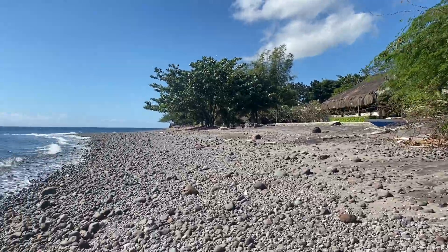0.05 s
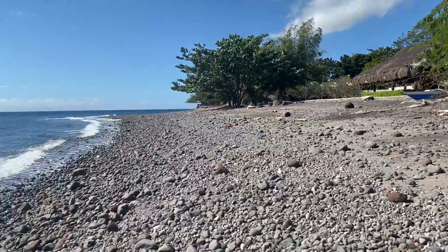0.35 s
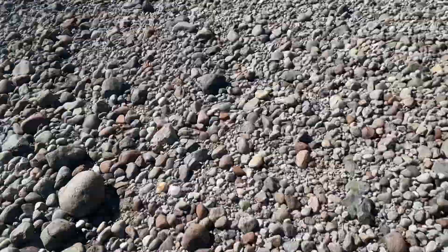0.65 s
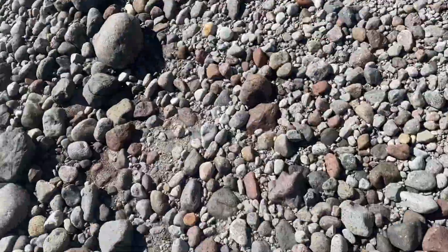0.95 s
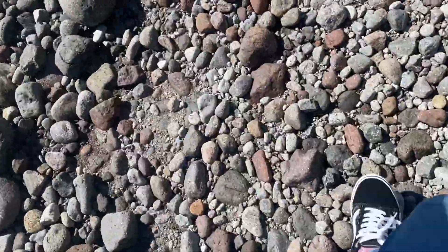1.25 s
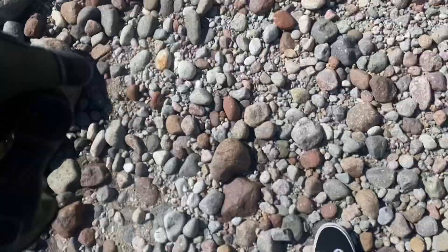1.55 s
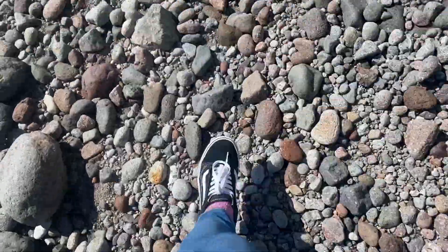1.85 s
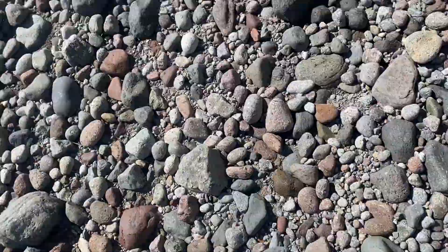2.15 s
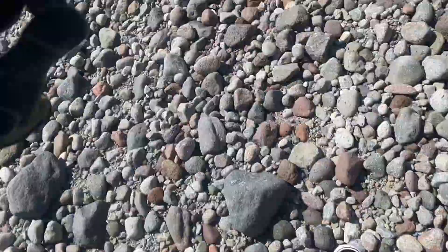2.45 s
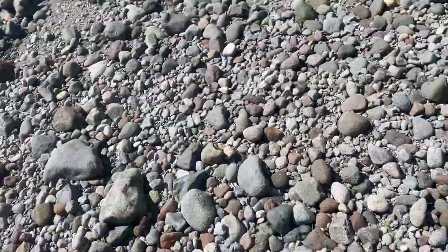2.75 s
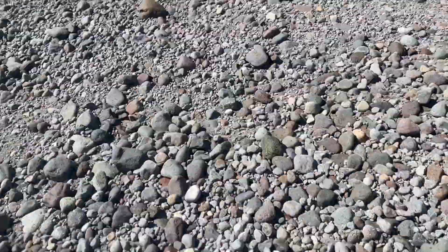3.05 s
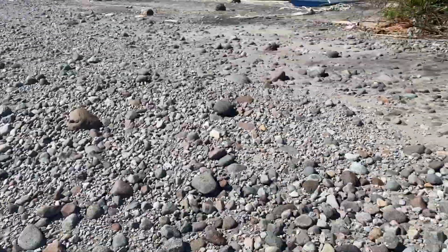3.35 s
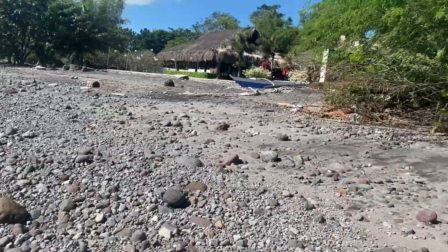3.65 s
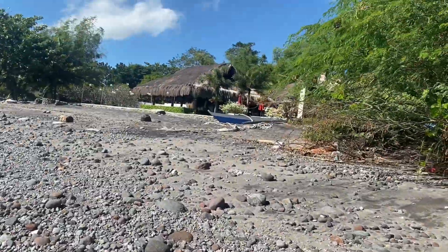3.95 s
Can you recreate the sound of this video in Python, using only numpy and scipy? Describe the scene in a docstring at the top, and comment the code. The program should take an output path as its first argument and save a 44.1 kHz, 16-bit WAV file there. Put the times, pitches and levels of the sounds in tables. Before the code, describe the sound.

Footsteps crunch over loose pebbles close to the microphone, stones clicking and knocking with each step. Surf washes softly along the beach behind them, and wind gusts thump on the microphone, stronger in the second half.

```python
"""Footsteps on a pebble beach

Close to a stereo microphone, someone walks over loose pebbles, a step about every 0.55 s.
Each step sets off a shower of tiny stone collisions and a few louder knocks.
Surf washes in the background, a far hum comes and goes, and gusts buffet the microphone."""
import sys
import numpy as np
from scipy import signal
from scipy.fft import rfft, irfft
from scipy.io import wavfile
from scipy.ndimage import uniform_filter1d

SR = 44100
rng = np.random.default_rng(int(sys.argv[2]) if len(sys.argv) > 2 else 0)


def wav_out(sig):
    """Save sig, one row per channel (or a flat mono array), as 16-bit PCM at SR to the path in sys.argv[1]."""
    wavfile.write(sys.argv[1], SR, np.round(np.clip(np.atleast_2d(sig).T, -1, 1) * 32767).astype(np.int16))


N = 176400

# Surf at the microphone (time [s], level [dB], share heard from behind [0-1])
SURF_LEVEL = [(0, -34.5, 0.15), (.3, -37, 0.048), (.55, -36.5, 0.01), (1.15, -37.5, 0.11),
              (1.7, -38.5, 0.11), (2.1, -36.5, 0.33), (2.5, -33.5, 0.39), (3, -33, 0.82),
              (3.5, -32.5, 0.92), (4, -32, 0.86)]
# The sea heard from the front (frequency [Hz], relative level [dB])
SURF_FRONT_COLOUR = [(30, -21), (60, -9.5), (130, -9.5), (280, -9), (660, -13.5), (1200, -18.5),
                     (1700, -22.5), (2900, -28), (4500, -31.5), (7000, -36.5), (10000, -39), (15000, -40.5)]
# The sea heard from behind (frequency [Hz], relative level [dB])
SURF_BACK_COLOUR = [(60, 4), (200, 4), (500, -4), (1100, -8.5), (1800, -8), (2600, -15.5), (3200, -21.5),
                    (6200, -22.5), (8000, -29), (10000, -32), (15000, -37.5)]
# Stereo image of the surf (frequency [Hz], left-right correlation [-1 to 1])
SURF_LIKENESS = [(60, 1), (280, 0.69), (600, -0.34), (1100, -0.51), (1700, -0.25), (2700, 0.47),
                 (3600, 0.0044), (6500, 0.097), (8500, 1), (10000, 0.97), (12000, 1), (15000, 0.44)]
# Wind on the microphone (time [s], level [dB])
WIND_LEVEL = [(0, -54), (.25, -36.5), (.42, -68), (.85, -45), (1.1, -35), (1.3, -42), (1.6, -34.5),
              (1.9, -36.5), (2.33, -44), (2.5, -22.5), (2.7, -34), (2.85, -27), (3.02, -34.5), (3.22, -28),
              (3.35, -24), (3.75, -26.5), (4, -30.5)]
# Its rumble (frequency [Hz], relative level [dB])
RUMBLE_COLOUR = [(20, -30), (32, -11), (45, 4), (75, 2.5), (150, -3), (300, -11.5), (500, -27.5),
                 (1000, -61), (4000, -69)]
# Single waves (peak time [s], half length [s], band centre [Hz], width [octaves], level [dB])
WAVE_WASHES = [(.05, 0.16, 2470, 0.28, -49.5), (.1, 0.22, 4460, 0.19, -57), (1.335, 0.15, 3200, 0.32, -50),
               (1.843, 0.18, 1700, 0.27, -50), (2.974, 0.044, 6000, 0.68, -49.5),
               (3.198, 0.42, 1830, 0.57, -49), (3.982, 0.12, 6370, .13, -51.5)]
# Eddies on the microphone (time [s], level [dB], final pitch [Hz], rise [cycles of that pitch])
EDDY_THUMPS = [(0.059, -25, 97, 0.97), (0.178, -22.5, 138, 0.76), (0.273, -28, 69, .8),
               (1.049, -25, 94, 1.06), (1.075, -25, 123, 1.2), (1.134, -28.5, 90, 0.79),
               (2.445, -23, 136, 1.7), (2.475, -23, 153, 0.67), (2.576, -22.5, 68.4, 0.93),
               (2.612, -17.5, 177, 1.24), (2.651, -24, 137, 1.7), (2.718, -12.5, 86.5, 1.8),
               (2.813, -9, 61, 1.03), (2.841, -15, 75, 1.55), (2.876, -14.5, 99, 1.5),
               (3.087, -12.5, 84, 0.95), (3.122, -18.5, 95, 0.92), (3.308, -10, 163, 1.93),
               (3.332, -15, 79.5, 1.26), (3.358, -21, 163, 1.8), (3.395, -11, 118, 1.37),
               (3.451, -18, 256, 2.5), (3.464, -16.5, 92, 1.46), (3.484, -11.5, 111, 1.23),
               (3.562, -9.5, 103, 1.12), (3.853, -16, 272, 2.03)]
# Shifts of weight (peak time [s], rise [s], fall [s], stones [dB], gravel [dB], grit [dB], sand [dB])
FOOT_PRESSES = [(.32, 0.037, 0.083, -37, -43.5, -54, -64), (.872, 0.012, 0.022, -31.5, -36, -45.5, -48),
                (0.88, 0.0035, 0.0064, -21, -30, -50, -56), (.893, .0015, 0.047, -30.5, -38, -43, -48),
                (.947, 0.0041, 0.022, -32.5, -38, -54, -50), (1.33, 0.07, 0.26, -50, -52, -53, -57),
                (1.40, 0.0098, 0.014, -31.5, -37, -56, -56), (1.431, 0.02, 0.043, -32.5, -39, -41, -53),
                (1.79, 0.012, 0.016, -40.5, -46.5, -52, -60), (2.036, 0.01, 0.043, -36, -35, -47, -45),
                (2.072, 0.017, 0.029, -35.5, -41, -40.5, -36),
                (2.16, 0.015, 0.06, -36.5, -38.5, -46.5, -51),
                (2.208, 0.0092, 0.031, -32.5, -41.5, -41.5, -47), (2.29, 0.015, 0.11, -57, -53, -57, -51),
                (2.505, .024, 0.055, -38.5, -38.5, -37, -43), (2.554, .018, 0.017, -29, -34, -37.5, -43),
                (3.11, 0.021, 0.031, -31.5, -36, -41.5, -45), (3.67, 0.055, 0.069, -37, -44, -49, -54)]
# Stones, gravel, grit, sand (lowest [Hz], highest [Hz], collisions [1/s], ring [cycles], spread [dB])
STONE_SIZES = [(617, 1930, 1100, 1.25, 2.5), (2300, 6230, 2500, 1.4, 2.5), (7460, 11800, 2400, 1, 3),
               (13400, 16000, 1200, 8.3, 5)]
# Phase scatter of the collisions, opposite in each channel (frequency [Hz], scale [rad])
STONE_SKEW = [(600, 0.52), (3000, 0.95), (7000, 0.35), (9000, 0.22)]
# The feet sound mostly to the left (frequency [Hz], left over right [dB])
FEET_LEAN = [(600, 1), (1200, 2.5), (5000, 2), (8000, -1)]
# Stone on stone (time [s], level [dB], pitch [Hz], crack against ring [dB], ring length [x usual])
STONE_KNOCKS = [(.286, -28.5, 9400, 0, 1), (.293, -32.5, 2210, 9, 1), (0.332, -25, 2070, 3, 1),
                (0.3972, -17, 1240, -2, 1), (0.3991, -24, 1260, -28, .7), (.3992, -27, 2300, -30, .7),
                (0.588, -50, 3000, 14, 1), (0.869, -18, 1090, -8, 1.3), (.869, -24, 3570, -13, 2),
                (0.8796, -15, 1150, -19, 1), (0.8799, -27, 5070, -15, 1.3), (0.891, -28, 5100, -12, 2),
                (.893, -13.5, 1190, -7, 1.5), (0.8944, -22, 3730, -28, 2), (.906, -35, 5170, -7, 1.3),
                (.922, -18, 1040, -10, 1), (0.9395, -7.5, 1077, -2.5, 1.2), (0.943, -19, 2450, -27, 1.6),
                (0.9492, -21, 2290, -7, 1.6), (1, -38, 2440, 8.5, 1), (1.121, -37, 2480, 2, 1),
                (1.397, -16.5, 1100, -21, .8), (1.42, -17.5, 1250, -7, .8), (1.436, -22, 1560, -18, 1.2),
                (1.472, -21.5, 2200, -7, 1), (1.545, -33, 2600, -12, 1), (2.003, -22.5, 635, -26, 1),
                (2.034, -24, 6000, 4.5, 1), (2.066, -18.5, 3800, -1, 1.2), (2.083, -32, 7440, 9, 1),
                (2.236, -24, 2650, 3.5, 1), (2.559, -12.5, 1070, -7.5, 1), (2.563, -26, 4200, -4, 1),
                (2.602, -22, 7400, 1.5, 1), (2.646, -21.5, 1100, -6.5, 1), (3.102, -26, 1480, -4, 1),
                (3.112, -36, 3450, -4, 1.5), (3.669, -29, 3030, -17, 2), (3.707, -36.5, 3550, 7.5, 1)]
# Ring of a knock (frequency [x pitch], level [dB], time to fall 60 dB [s])
STONE_MODES = [(.82, -17, .026), (1., -5.5, .01), (1.42, -7, .004), (2.38, -17, .012), (3.1, -21, .008)]
# The far hum (time [s], level [dB])
HUM_LEVEL = [(0, -68), (.35, -62), (.55, -41.5), (1.2, -41), (1.7, -39), (2.1, -50.5), (2.5, -45)]
# Big stones bedding down under the sole (time [s], level [dB], pitch [Hz])
STONE_THUDS = [(0.88, -29, 423), (.891, -29, 407), (0.8965, -17.5, 350), (1.398, -27, 426),
               (2.005, -30, 486), (2.548, -24.5, 395)]
# Lag of the left channel behind the right (frequency [Hz], lag [cycles])
MIC_LAG = [(0, 0), (6300, 0), (7400, .12), (8450, .5), (9600, .93), (10800, 1.07), (12100, 1.5),
           (13300, 1.93), (14500, 2.07), (16000, 2.5)]

SEA_PAN_DB, WALK_PAN_DB = 2, -0.2  # left over right
OPPOSITE = np.array([[1], [-1]])  # signs for left and right


def amp(db):
    """Decibels to gain."""
    return 10 ** (np.asarray(db) / 20)


def unit(x):
    """Scales to rms 1."""
    return x / np.sqrt(np.mean(x ** 2) + 1e-20)


def over_hz(points, hz):
    """Reads a spectrum on a log-frequency axis."""
    f, value = np.transpose(points)
    return np.interp(np.log(hz + 1), np.log(f + 1), value)


def over_time(points, column=1):
    """Reads one column of a curve at every sample."""
    rows = np.array(points)
    return np.interp(np.arange(N) / SR, rows[:, 0], rows[:, column])


def add(mix, s, sound):
    """Mixes a stereo sound in at time s."""
    part = mix[:, max(round(s * SR), 0):][:, :sound.shape[1]]
    part += sound[:, :part.shape[1]]


def pan(db):
    """Left and right gains for a level difference."""
    return amp(OPPOSITE * db / 2)


def filtered(x, order, hz, kind="low"):
    """Low-, high- or band-pass filter."""
    return signal.sosfilt(signal.butter(order, hz, kind, fs=SR, output="sos"), x)


def noise(colour, likeness, patch_db, flutter_db):
    """Stereo noise with drifting patches and a flutter shared by all frequencies."""
    hz = np.fft.rfftfreq(1024, 1 / SR)
    frames = N // 256 + 5
    a, b, c, d, patches = rng.standard_normal((frames, len(hz), 5)).T
    patches = unit(uniform_filter1d(uniform_filter1d(patches, size=14, axis=0), size=10, axis=1))
    flutter = unit(uniform_filter1d(rng.standard_normal(frames), size=5))
    like = np.clip(over_hz(likeness, hz), -1, 1)[:, None]
    left = a + 1j * b
    right = like * left + np.sqrt(1 - like ** 2) * (c + 1j * d)
    gain = amp(over_hz(colour, hz)[:, None] + patch_db * patches + flutter_db * flutter)
    return unit(signal.istft(gain * np.array([left, right]), nperseg=1024, noverlap=768)[1][:, :N])


def surf():
    """The sea, a little to the left, changes colour as the walker turns away from it."""
    behind = np.clip(over_time(SURF_LEVEL, column=2), 0, 1)
    front = np.sqrt(1 - behind) * noise(SURF_FRONT_COLOUR, SURF_LIKENESS, patch_db=0.8, flutter_db=0.66)
    back = np.sqrt(behind) * noise(SURF_BACK_COLOUR, SURF_LIKENESS, patch_db=2.4, flutter_db=0.5)
    return amp(over_time(SURF_LEVEL)) * pan(SEA_PAN_DB) * (front + back)


def wind(likeness=0.68):
    """Gusts blow across the microphone with a lumpy rumble."""
    rumble = noise(RUMBLE_COLOUR, [(20, likeness), (500, likeness)], patch_db=0.2, flutter_db=6.0)
    return amp(over_time(WIND_LEVEL)) * rumble


def washes():
    """Waves run up and drain through the shingle: a band of hiss swells and fades."""
    t, out = np.arange(N) / SR, np.zeros((2, N))
    f = np.fft.rfftfreq(N, 1 / SR)
    for s, half_s, hz, octaves, db in WAVE_WASHES:
        band = np.exp(-(np.log2((f + 1) / hz) / octaves) ** 2)
        white = rng.standard_normal((2, N)) + 1.3 * rng.standard_normal(N)  # sides plus centre
        hiss = unit(irfft(rfft(white) * band, N))
        out += amp(db) * np.exp(-((t - s) / half_s) ** 2 / 2) * hiss
    return pan(SEA_PAN_DB) * out


def eddies(start_hz=539, sag_s=0.0037, puff_db=-16.5, puff_rise_s=0.0048):
    """Eddies hit the microphone itself: a rough puff, then a thump whose pitch quickly sags."""
    t, out = np.arange(4000) / SR, np.zeros((2, N))
    for s, db, hz, cycles in EDDY_THUMPS:
        phase, skew = rng.uniform(-1.2, 1, 2)
        turns = np.cumsum(hz + (start_hz - hz) * np.exp(-t / sag_s)) / SR
        swing = np.sin(2 * np.pi * turns + np.pi * phase + 0.97 * skew * OPPOSITE)
        age = hz * t / cycles
        thump = age ** 2 * np.exp(1 - age ** 2) * swing
        puff = unit(filtered(rng.standard_normal(len(t)), order=4, hz=414))
        puff *= amp(puff_db) * t / puff_rise_s * np.exp(1 - t / puff_rise_s)
        add(out, s, amp(db) * (thump + puff))
    return out


def collisions(low_hz, high_hz, per_s, cycles, spread_db, count=28, scatter_db=-3):
    """Stones of one size collide at random: each rings briefly, from its own direction."""
    strengths = amp(spread_db * np.minimum(rng.exponential(1, N), 4)) * rng.choice([-1, 1], N)
    hits = strengths * (rng.random(N) < per_s / SR)
    stone = rng.integers(0, count, N)
    t, out = np.arange(700) / SR, np.zeros((2, N))
    for k, (detune, side, lag) in enumerate(rng.uniform(-1.35, 1, (count, 3))):
        hz = low_hz * (high_hz / low_hz) ** ((k + .5 + detune / 2) / count)
        turns = hz * t
        skew = lag * over_hz(STONE_SKEW, hz) * OPPOSITE
        ring = np.sin(2 * np.pi * turns + skew) * np.exp(-turns / cycles) * (1 - np.exp(-2 * turns))
        ring *= pan(over_hz(FEET_LEAN, hz) + scatter_db * side)
        out += signal.oaconvolve((hits * (stone == k))[None], ring, axes=1)[:, :N]
    return unit(out)


def crunch(loose_db=(-53, -61.5, -65)):
    """The shoe presses in and lets go; stones, gravel, grit and sand rattle with the pressure."""
    t, out = np.arange(N) / SR, np.zeros((2, N))
    for k, size in enumerate(STONE_SIZES):
        power = np.zeros(N)
        for s, rise, fall, *levels_db in FOOT_PRESSES:
            pressure = np.exp(-np.where(t < s, ((t - s) / rise) ** 2 / 2, (t - s) / fall))
            power += (amp(levels_db[k]) * pressure) ** 2
        out += np.sqrt(power) * collisions(*size)
    # Loose stones, gravel and grit tick faintly throughout.
    for db, (low_hz, high_hz, _, cycles, _) in zip(loose_db, STONE_SIZES):
        out += amp(db) * collisions(low_hz, high_hz, per_s=45, cycles=cycles, spread_db=1.5, count=12)
    return out


def knocks(crack_s=0.0014):
    """Larger stones strike underfoot with a crack and a short hollow ring."""
    t, out = np.arange(1500) / SR, np.zeros((2, N))
    for s, db, hz, crack_db, length in STONE_KNOCKS:
        ring = sum(amp(level - 60 * t / (t60 * length)) * np.sin(2 * np.pi * hz * ratio * t)
                   for ratio, level, t60 in STONE_MODES if hz * ratio < SR / 2)
        white = rng.standard_normal(len(t)) + 0.52 * rng.standard_normal((2, len(t)))
        edges_hz = [0.56 * hz, min(2.6 * hz, 15800)]
        crack = filtered(white * np.exp(-t / crack_s), order=3, hz=edges_hz, kind="band")
        crack *= amp(crack_db) / abs(crack).max()
        add(out, s, amp(db) * pan(WALK_PAN_DB) * (ring + crack))
    return out


def ground_scatter(feet, tail_db=-8.5, t60=0.032):
    """The stony ground around the feet scatters each sound into a very short, dull tail."""
    t = np.arange(5000) / SR
    tail = rng.standard_normal((2, len(t))) * amp(-60 * t / t60) * (t > .001)
    tail = filtered(tail / np.linalg.norm(tail[0]), order=2, hz=6000)
    return feet + amp(tail_db) * signal.oaconvolve(feet, tail, axes=1)[:, :N]


def hum(pitch_hz=156.3):
    """A low, slightly wavering hum, perhaps a far boat."""
    waver = unit(filtered(rng.standard_normal(N), order=2, hz=5))
    turns = np.cumsum(pitch_hz * (1 + 0.0076 * waver)) / SR
    return amp(over_time(HUM_LEVEL)) * unit(np.sin(2 * np.pi * turns))


def thuds(rise_s=0.0019):
    """A big stone pressed into the beach gives a dull, quickly damped push."""
    t, out = np.arange(1500) / SR, np.zeros((2, N))
    push = t / rise_s * np.exp(1 - t / rise_s)
    for s, db, hz in STONE_THUDS:
        add(out, s, amp(db) * pan(WALK_PAN_DB) * push * np.sin(2 * np.pi * hz * t))
    return out


def ping(at_s=1.054, db=-31, hz=7180, t60=0.018):
    """One small pebble rings: a high tone, its octave and a little hiss."""
    t, out = np.arange(1500) / SR, np.zeros((2, N))
    ring = np.sin(2 * np.pi * hz * t) + amp(-1) * np.sin(2 * np.pi * 2 * hz * t)
    hiss = .5 * rng.standard_normal(len(t))
    add(out, at_s, pan(WALK_PAN_DB) * amp(db - 60 * t / t60) * (ring + hiss))
    return out


def scene():
    """Footsteps close by, surf and hum further off, wind right on the microphone."""
    sea_and_wind = surf() + wind() + washes() + eddies()
    footsteps = ground_scatter(crunch() + knocks() + thuds() + ping())
    return sea_and_wind + footsteps + hum()


def record(dry, low_cut_hz=49, high_cut_hz=15800):
    """The stereo microphone: the left channel lags in the treble; a low cut, then the band limit."""
    lag = np.interp(np.fft.rfftfreq(N, 1 / SR), *np.transpose(MIC_LAG))
    paired = irfft(rfft(dry) * np.exp(-1j * np.pi * lag * OPPOSITE), N)
    thinned = filtered(paired, order=2, hz=low_cut_hz, kind="high")
    band_limit = signal.firwin(511, high_cut_hz, window=("kaiser", 9), fs=SR)
    return signal.oaconvolve(thinned, band_limit[None], "same")


dry = scene()
out = record(dry)
wav_out(out)
```